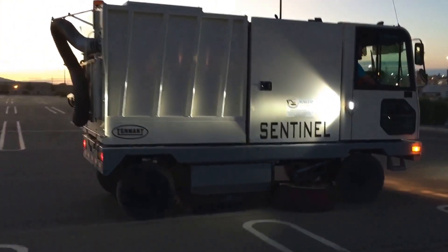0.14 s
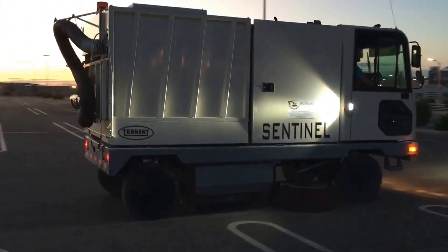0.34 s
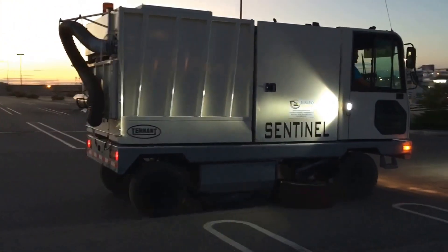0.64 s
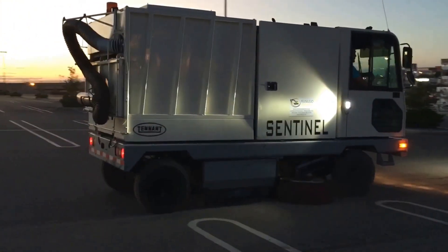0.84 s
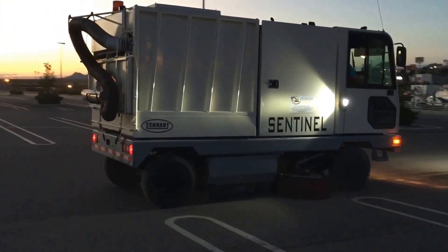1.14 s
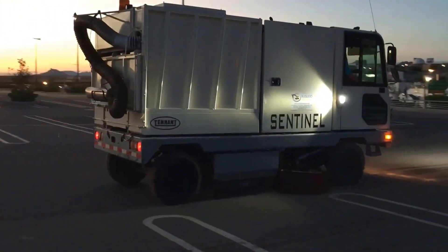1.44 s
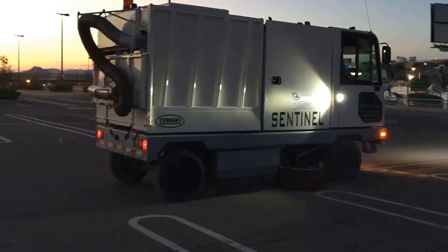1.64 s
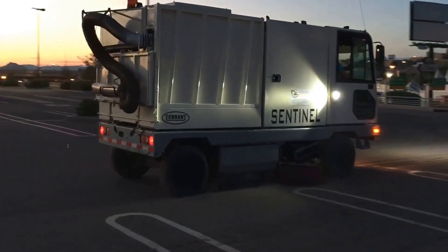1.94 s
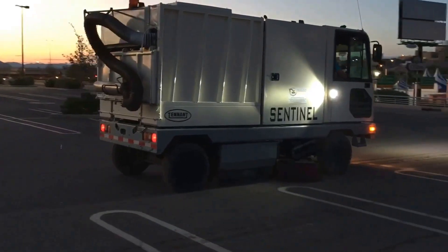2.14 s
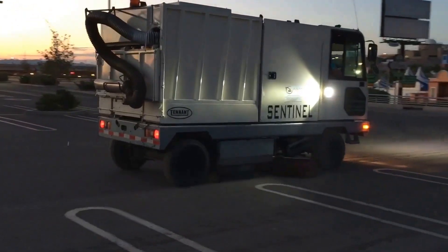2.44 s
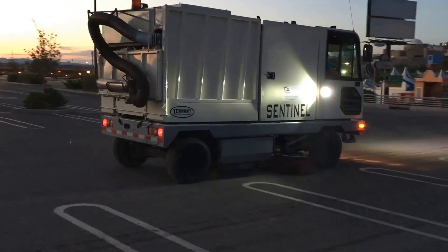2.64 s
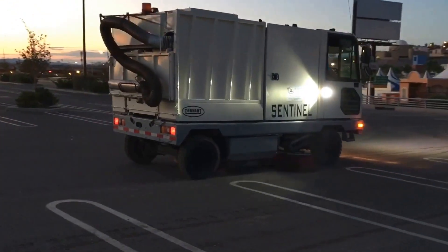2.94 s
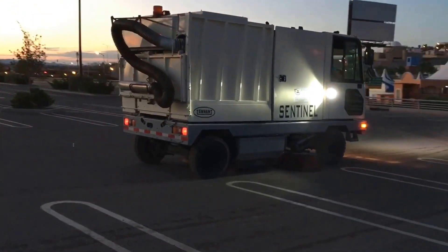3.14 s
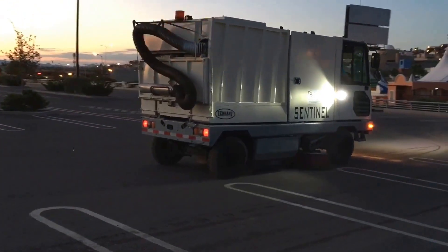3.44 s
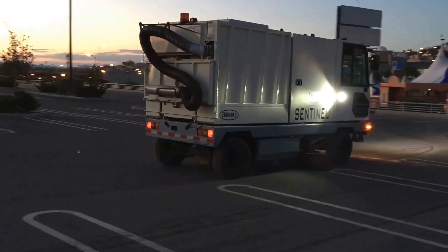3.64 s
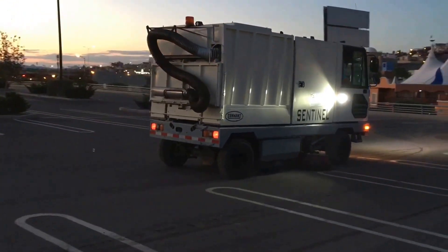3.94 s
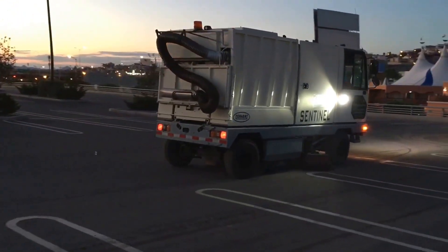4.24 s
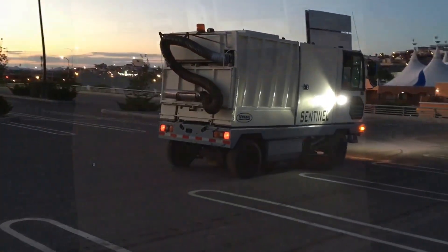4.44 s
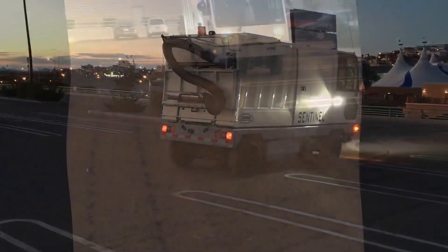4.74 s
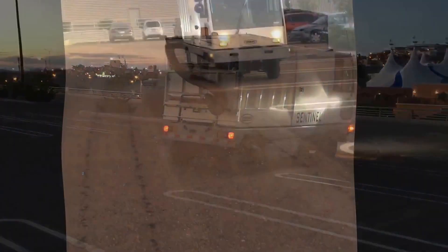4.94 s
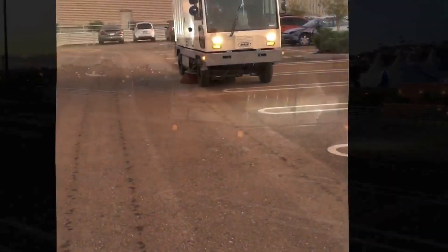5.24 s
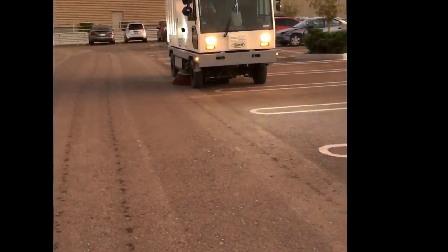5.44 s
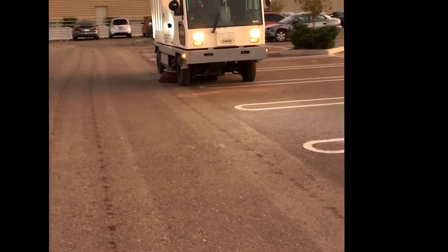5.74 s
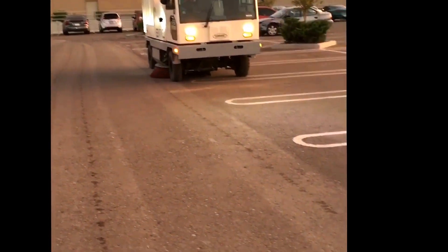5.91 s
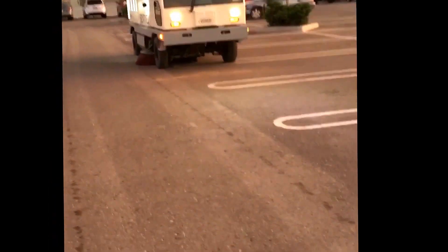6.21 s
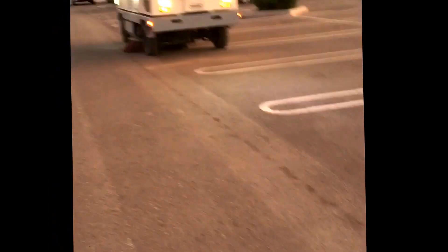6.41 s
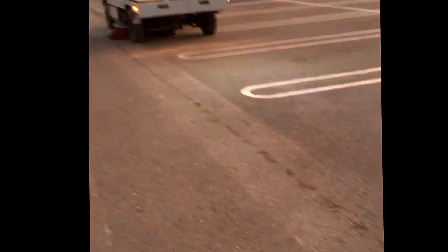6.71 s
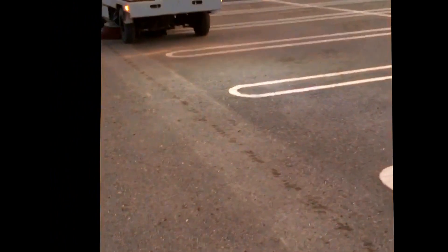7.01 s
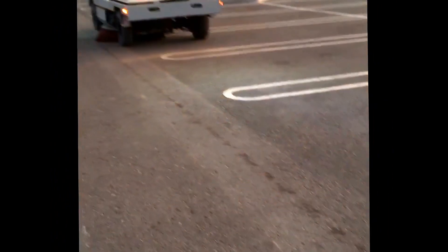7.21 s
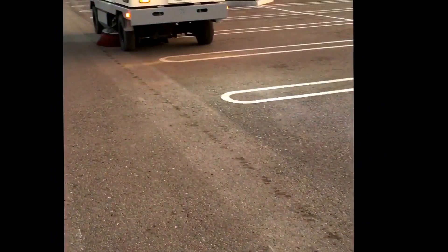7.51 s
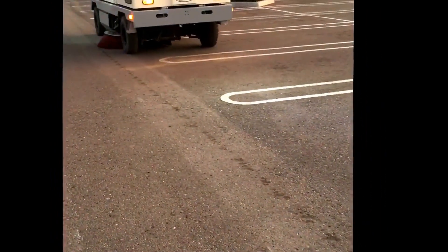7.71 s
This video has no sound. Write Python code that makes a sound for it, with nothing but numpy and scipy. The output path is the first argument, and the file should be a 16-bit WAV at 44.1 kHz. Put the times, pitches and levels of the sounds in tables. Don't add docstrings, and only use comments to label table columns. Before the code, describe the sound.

Close sweeping machine hums, knocks and whines over hissing brooms on asphalt, gradually receding, then fades into a quieter approach with faint bristle squeals.

```python
import sys
import numpy as np
from scipy import signal
from scipy.fft import rfft, irfft
from scipy.io import wavfile
from scipy.ndimage import uniform_filter1d

SR = 44100
rng = np.random.default_rng(int(sys.argv[2]) if len(sys.argv) > 2 else 0)


def generate_wav(sig):
    pcm = np.round(np.clip(np.atleast_2d(sig).T, -1, 1) * 32767).astype(np.int16)
    wavfile.write(sys.argv[1], SR, pcm)


def ratio_of_db(decibels):
    return 10 ** (np.asarray(decibels, float) / 20)


N = 347067
T = np.arange(N) / SR

# start t/s, end t/s
VIEW_FADE = (4.25, 5.1)
# start t/s, end t/s
CROSS_FADE = (4.56, 5.26)

# t/s, f/Hz
FIRING_RATE = [(0, 51.63), (1.6, 51.68), (3, 51.74), (4, 51.65), (5, 51.65), (5.5, 51.93), (7.87, 51.88)]
# near level/dB, far level/dB, loudest t/s, echo round/s, echo share [0-1]
FIRING_TONES_SWELL = [(-28, -25.5, 0.68, 2.7, 0.04), (-26.5, -40.5, 1.27, 3.44, .45)]
# t/s, level/dB
DRONE_LEVEL = [(0, -16.5), (1.6, -17), (1.9, -18), (3.0, -21), (4.4, -20.5), (4.8, -24), (5.2, -35),
               (5.5, -31), (7.55, -29), (7.87, -24)]
# multiple [of firing rate], near level/dB, far level/dB
UNEVEN_TONES = [(1.25, -32, -39), (1.5, -31, -37), (2.5, -43, -38.5), (3, -70, -39.5), (3.25, -43, -45.5),
                (3.75, -45, -45.5), (4, -44.5, -51), (5.25, -45.5, -43.5), (5.75, -47.5, -56),
                (6.5, -47, -52), (7.5, -48, -50), (13, -54.5, -51.5)]
# f/Hz, level/dB per Hz
RUMBLE_SPECTRUM = [(22, -19), (38, -6), (50, 0), (64, 4), (85, -6), (95, 2.5), (118, -12), (135, -42),
                   (170, -28)]
# near level/dB, far level/dB, loudest t/s, echo round/s, echo share [0-1, more is held inside]
RUMBLE_SWELL = (-23.5, -30.5, 0.8, 4.5, 1.3)
CYLINDER_KNOCKS = (11, -17, 4.5, 4)
# f/Hz, width/Hz, level/dB
BLOCK_RINGS = [(1670, 77, -1), (1790, 250, -2.5), (2092, 200, -5), (2770, 76, -5), (3510, 570, -13.5)]
# near level/dB, far level/dB, loudest t/s, echo round/s, echo share [0-1, more is held inside]
KNOCK_SWELL = (-36.5, -40.5, 4, 11, 2)

# t/s, f/Hz
PUMP_TOOTH_RATE = [(0, 561.5), (1.2, 561.6), (2, 562.1), (2.4, 561.8), (3.1, 562.7), (4, 561.9),
                   (4.9, 561.1), (5.6, 562.3), (6.4, 563.0), (7.87, 562.7)]
# near level/dB, far level/dB, loudest t/s, echo round/s, echo share [0-1]
PUMP_SWELL = [(-42.5, -50.5, 4.8, 3, 0.16), (-32.5, -43.5, 2.9, 4.45, 0.78), (-44.5, -54, 3.9, 6.3, 0.76),
              (-36, -55, 0.63, 4.9, 0.54)]
# near level/dB, far level/dB, loudest t/s, echo round/s, echo share [0-1]
WHINE_SWELL = [(-44.5, -58, 0.44, 6, .8), (-43, -60, 4.2, 3.0, .3), (-45.5, -66, 1.4, 2.7, .4),
               (-43.5, -66, 4.75, 6.1, .9), (-46, -58, 2.6, 4.8, 0.73)]
# multiple [of shaft rate], near level/dB, far level/dB
SHAFT_TONES = [(37, -45, -49), (40, -61, -49), (49, -51, -61), (51, -47.5, -63)]

# f/Hz, level/dB per Hz
NEAR_BODY = [(25, -63), (40, -42), (62, -48), (90, -56), (140, -47), (205, -46.5), (225, -46.5), (300, -47),
             (410, -48), (485, -59.5), (600, -53), (1000, -51), (1250, -54), (1430, -61)]
# f/Hz, level/dB per Hz
FAR_BODY = [(25, -66), (40, -47), (62, -45), (90, -52), (140, -46), (205, -46), (225, -55), (300, -54.5),
            (410, -57.5), (485, -67.5), (600, -61.5), (1000, -67.5), (1250, -63.5), (1430, -66)]
# f/Hz, level/dB per Hz
NEAR_AIR = [(1430, -64.8), (1700, -59), (2000, -62.5), (2250, -62.5), (2620, -69), (3500, -71), (4500, -70),
            (4950, -75), (5600, -72), (8000, -75.5), (8800, -72), (10400, -78), (11800, -75), (15500, -80)]
# f/Hz, level/dB per Hz
FAR_AIR = [(1430, -65.6), (1700, -63.5), (2000, -68), (2250, -68), (2620, -71), (3500, -70), (4500, -72.5),
           (4950, -77), (5600, -73.5), (8000, -75.5), (8800, -79.5), (10400, -80.5), (11800, -76.5),
           (15500, -82)]
# low f/Hz, high f/Hz
LAYER_BANDS = [(130, 245), (600, 1050), (2900, 4800), (6000, 15000)]
# near level/dB at the start, change/dB per s, far level/dB at the end, change/dB per s
LAYER_LEVELS = [(-29.5, -.2, -31, 0.8), (-34, -0.15, -36, 0.8), (-31, -0.98, -40, 0.06),
                (-29, -1.0, -34, 0.75)]
GUST_SHARE = (0.54, 0.26, .9, 0.96)
# t/s, length/s, change level/dB
NOISE_GUSTS = [
    (2.11, .07, -2),
    (2.204, 0.11, 1.5),
    (5.126, 0.082, -1.5),
    (5.334, .1, -3),
]
# t/s, depth [0-1]
BOUNCE_DEPTH = [(0, 0.14), (.7, 0.75), (1.5, 1), (2.2, 0.57), (3, 0.16), (5, 0.56), (5.6, 0.2), (7.87, 0.2)]

# t/s, level/dB, length/s
GRIT_RATTLES = [
    (.66, -30, .03),
    (.895, -26, .02),
    (1.395, -26, .035),
    (2.145, -29, .025),
    (2.65, -31, .03),
    (6.125, -29, .025),
    (6.619, -25, .028),
    (7.617, -33, .02),
]
# f/Hz, width/Hz, level/dB
HOSE_RINGS = [(700, 300, 0), (1150, 350, 0), (1650, 300, 1), (2300, 500, -6)]
# t/s, f/Hz, level/dB
BROOM_SQUEAL = [
    (5.4, 4230, -52),
    (6.05, 4240, -54),
    (6.2, 4280, -43),
    (6.45, 4290, -47),
    (6.63, 4340, -45),
    (6.68, 4250, -56),
    (7.2, 4290, -54),
    (7.55, 4240, -44),
    (7.87, 4300, -58),
]


def evened(x):
    return x / np.sqrt(np.mean(x ** 2) + 1e-20)


def read(points, hz):
    f, value = np.transpose(points)
    return np.interp(np.log(hz + 1), np.log(f + 1), value)


def curves(rows, t):
    s, *columns = np.transpose(rows)
    return [np.interp(t, s, column) for column in columns]


def progress(span, t):
    start, end = span
    return np.clip((t - start) / (end - start), 0, 1)


def near_to_far(near_db, far_db, t):
    return near_db + progress(VIEW_FADE, t) * (far_db - near_db)


def crossed(near_db, far_db, t):
    share = progress(CROSS_FADE, t)
    near_power = (1 - share) ** 2 * ratio_of_db(2 * near_db)
    far_power = share ** 2 * ratio_of_db(2 * far_db)
    return 10 * np.log10(near_power + far_power)


def swelling(near_db, far_db, loudest_s, round_s, echo):
    echo = np.clip(echo, 0, .95)
    both = abs(1 + echo * np.exp(2j * np.pi * (T - loudest_s) / round_s)) / (1 + echo)
    return crossed(near_db + 20 * np.log10(both), far_db, T)


def drift(rate_hz):
    t = T[::256]
    waves = 0
    for f in np.geomspace(rate_hz / 12, rate_hz, 16):
        waves = waves + np.sin(2 * np.pi * (f * t + rng.random())) / np.sqrt(f)
    return np.interp(T, t, evened(waves))


def tone(turns, db, waver_db, rate_hz):
    strength = np.sqrt(2) * ratio_of_db(db + waver_db * drift(rate_hz))
    return strength * np.sin(2 * np.pi * (turns + rng.random()))


def resonate(x, hz, width_hz):
    turn = np.exp(2j * np.pi * np.cumsum(hz * np.ones(len(x))) / SR)
    r = np.exp(-np.pi * width_hz / SR)
    return 2 * (turn * signal.lfilter([1 - r], [1, -r], x / turn)).real


def firings():
    return 1.15 + np.cumsum(curves(FIRING_RATE, T)[0]) / SR


def lopsided(turns):
    chance = rng.uniform(-np.sqrt(3), np.sqrt(3), int(turns[-1]) + 2)
    chance = chance - uniform_filter1d(chance, 5)
    lead = (.3 + .12 * drift(3.0)) * np.cos(np.pi / 2 * turns)
    return 1 + lead + .38 * np.interp(turns, np.arange(len(chance)), chance)


def engine():
    turns = firings()
    lowest_db, fifth_db = (swelling(*row) for row in FIRING_TONES_SWELL)
    lowest_db = lowest_db + 4.5 * np.clip((T - 7.4) / .25, 0, 1)
    out = tone(turns, lowest_db, 1.6, 9.0)
    out += lopsided(turns) * tone(2 * turns, curves(DRONE_LEVEL, T)[0], 0.72, 5.2)
    out += tone(5 * turns, fifth_db, 1.1, 9.0)
    for multiple, near_db, far_db in UNEVEN_TONES:
        out += tone(multiple * turns, near_to_far(near_db, far_db, T), 3.0, 3.0)
    return out


def rumble(throb=0.18):
    hz = np.fft.rfftfreq(N, 1 / SR)
    shape = ratio_of_db(read(RUMBLE_SPECTRUM + [(400, -90)], hz))
    low = evened(irfft(rfft(rng.standard_normal(N)) * shape, N))
    low = low / np.sqrt(uniform_filter1d(low ** 2, SR // 8))
    return ratio_of_db(swelling(*RUMBLE_SWELL)) * low * (1 + throb * np.cos(np.pi / 2 * firings()))


def knock():
    turns = firings()
    cylinder = turns.astype(int) % 4
    burst = ratio_of_db(np.array(CYLINDER_KNOCKS))[cylinder] * np.exp(-(turns % 1) / .45)
    drive = uniform_filter1d(burst, 90) * ratio_of_db(2.8 * drift(14.0)) * rng.standard_normal(N)
    ring = 0
    for hz, width_hz, db in BLOCK_RINGS:
        ring = ring + ratio_of_db(db) * resonate(resonate(drive, hz, width_hz), hz, width_hz)
    return ratio_of_db(swelling(*KNOCK_SWELL)) * evened(ring)


def pumps():
    turns = np.cumsum(curves(PUMP_TOOTH_RATE, T)[0]) / SR
    other = .9839 * turns
    shaft = turns / 13
    db1, db2, other_db1, other_db2 = (swelling(*row) for row in PUMP_SWELL)
    out = tone(turns, db1, 1.5, 8.0) + tone(2 * turns, db2, 1.8, 14.0)
    out += tone(other, other_db1, 3.5, 6.1) + tone(2 * other, other_db2, 0.61, 13.0)
    for multiple, row in zip((38, 39, 52, 64, 66), WHINE_SWELL):
        out += tone(multiple * shaft, swelling(*row), 2.0, 16.0)
    for multiple, near_db, far_db in SHAFT_TONES:
        out += tone(multiple * shaft, near_to_far(near_db, far_db, T), 1.84, 5.0)
    return out


def layer_levels(t):
    gust_db = sum(db * np.exp(-(2 * (t - s) / length) ** 4) for s, length, db in NOISE_GUSTS)
    levels = []
    for (near_db, away, far_db, closer), share in zip(LAYER_LEVELS, GUST_SHARE):
        level_db = crossed(near_db + away * t, far_db + closer * (t - t[-1]), t)
        levels.append(level_db + share * gust_db)
    return levels


def apart_patches():
    low, high, width = 4200, 14400, 1600
    draws = rng.random((round(4 * N / SR), 5))
    for when, many, *places in draws:
        for place in places[:1 + int(3 * many ** 2)]:
            low_hz = low * (high / low) ** place ** .8
            yield when * N / SR, low_hz, low_hz + width * (low_hz / high) ** .3


def apart_share(t, hz):
    apart = np.zeros((len(hz), len(t)))
    for s, low_hz, high_hz in apart_patches():
        inside = (hz > low_hz) & (hz < high_hz)
        apart[inside] += np.cos(np.pi / 2 * np.clip((t - s) * SR / 850, -1, 1))
    return np.minimum(apart, 1)


def roar(patchy_db=0.85, ridges_db=1.42, flicker_db=0.1):
    frames, hz = N // 256 + 5, np.fft.rfftfreq(1024, 1 / SR)
    t = np.arange(frames) * 256 / SR
    a, b, c, d, patches, ridges = rng.standard_normal((frames, 513, 6)).T
    near_db = read(NEAR_BODY + NEAR_AIR[1:], hz)[:, None]
    far_db = read(FAR_BODY + FAR_AIR[1:], hz)[:, None]
    shape_db = near_to_far(near_db, far_db, t)
    lifts = []
    for db, (low_hz, high_hz) in zip(layer_levels(t), LAYER_BANDS):
        inside = (hz > low_hz) & (hz < high_hz)
        power = np.mean(ratio_of_db(2 * shape_db[inside]), 0) * (high_hz - low_hz)
        lifts.append(db - 10 * np.log10(power))
    centres = np.sqrt(np.prod(LAYER_BANDS, 1))
    shares = np.array([read(list(zip(centres, row)), hz) for row in np.eye(len(LAYER_BANDS))])
    patches = evened(uniform_filter1d(uniform_filter1d(patches, 10, 0), 14, 1))
    ridges = evened(uniform_filter1d(uniform_filter1d(ridges, 3, 0), 90, 1))
    flicker = evened(uniform_filter1d(rng.standard_normal(frames), 5)) * (hz > 1500)[:, None]
    texture_db = (patchy_db * patches + ridges_db * ridges) * (hz > 450)[:, None] + flicker_db * flicker
    size = ratio_of_db(shape_db + shares.T @ lifts + texture_db)
    apart = apart_share(t, hz)
    common = (a + 1j * b) * np.sqrt(1 - apart ** 2 / 2)
    twin = (c + 1j * d) * apart * np.sqrt(.5)
    unit = np.sqrt(SR / 1024 / 2) * np.sqrt(3)
    spectra = np.array([common, twin]) * size * unit
    return signal.istft(spectra, nperseg=1024, noverlap=768)[1][:, :N]


def above_rumble(x):
    return signal.sosfilt(signal.butter(6, 120, "high", fs=SR, output="sos"), x)


def ground_echo(x, hz=450.0, width_hz=118.0):
    return x - curves(BOUNCE_DEPTH, T)[0] * resonate(x, hz, width_hz)


def rattles():
    grit = (rng.random(N) < 4000 / SR) * rng.standard_normal(N)
    ring = evened(sum(ratio_of_db(db) * resonate(grit, hz, width_hz) for hz, width_hz, db in HOSE_RINGS))
    strength = 0
    for s, db, length in GRIT_RATTLES:
        rise = np.clip((T - s) / .004, 0, 1)
        strength = strength + ratio_of_db(db) * np.exp(-np.clip((T - s) / length, 0, 30)) * rise
    return ring * strength


def squeal():
    hz, db = curves(BROOM_SQUEAL, T)
    hz = hz + 20 * drift(16.0)
    fuzz = resonate(resonate(rng.standard_normal(N), hz, 70.0), hz, 70.0)
    core = tone(np.cumsum(hz) / SR, -8, 2.5, 20.0)
    return ratio_of_db(db) * evened(evened(fuzz) + core) * (T > BROOM_SQUEAL[0][0])


def scene():
    noise, twin = roar()
    machine = engine() + rumble() + knock() + pumps()
    mid = machine + ground_echo(above_rumble(noise)) + rattles() + squeal()
    return np.array([mid + twin, mid - twin])


def low_pass(x):
    return signal.sosfilt(signal.butter(12, 15840, fs=SR, output="sos"), x)


def record(dry):
    return low_pass(dry)


dry = scene()
out = record(dry)
generate_wav(out)
```